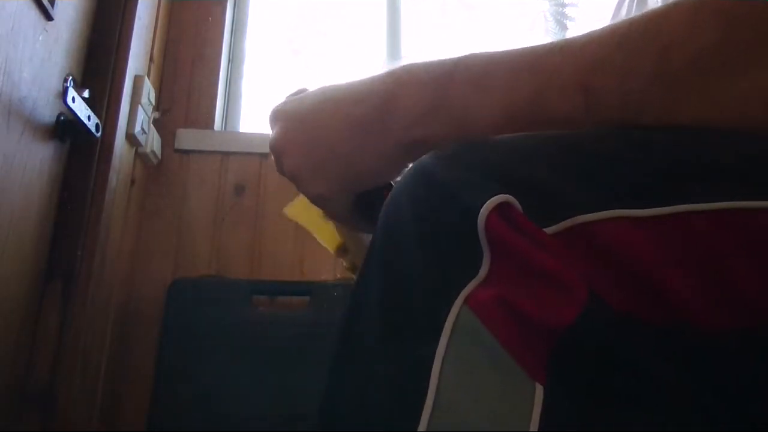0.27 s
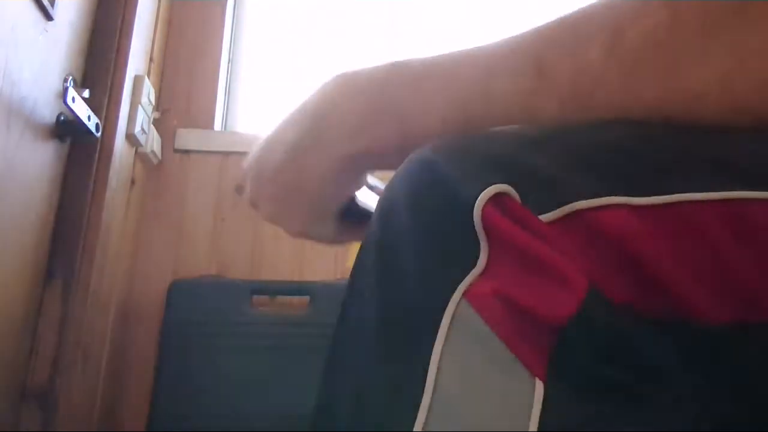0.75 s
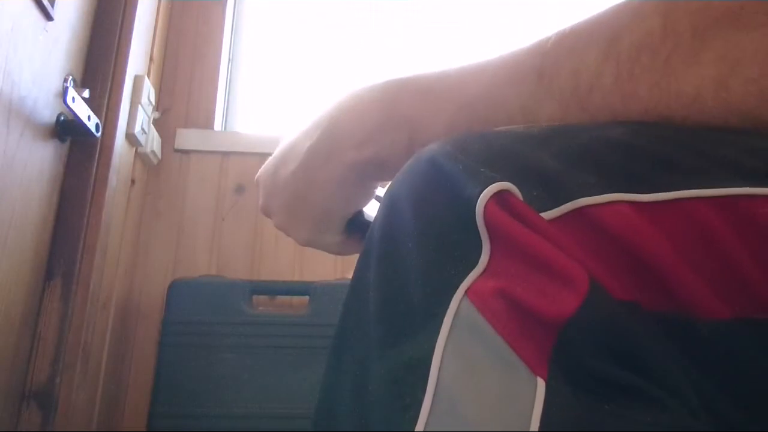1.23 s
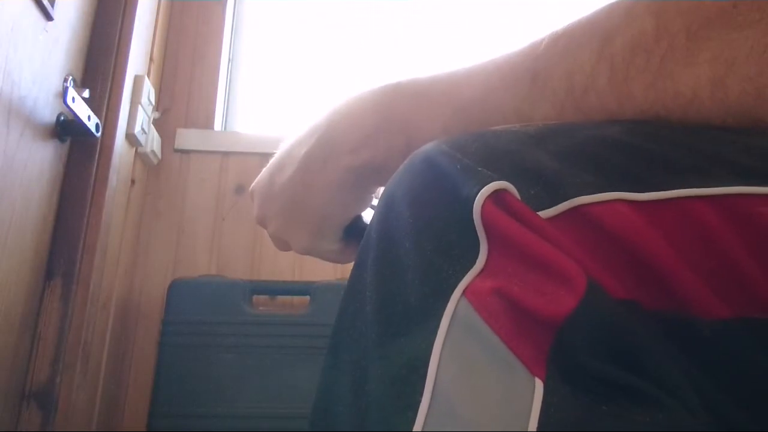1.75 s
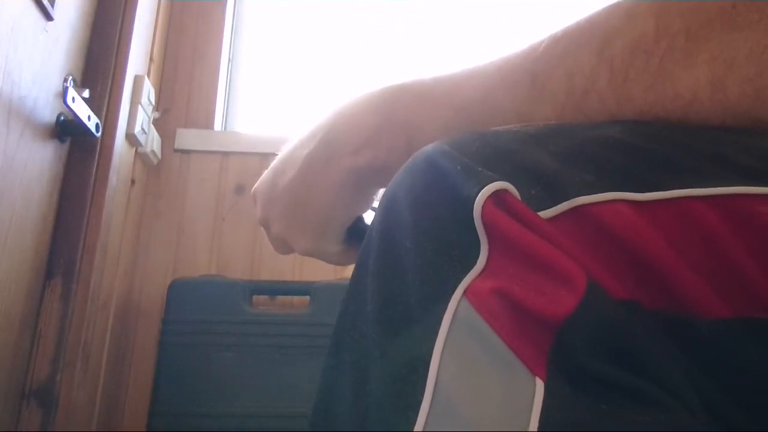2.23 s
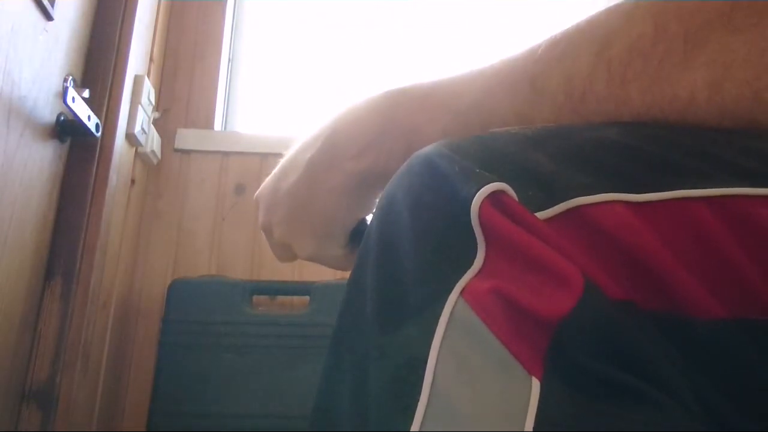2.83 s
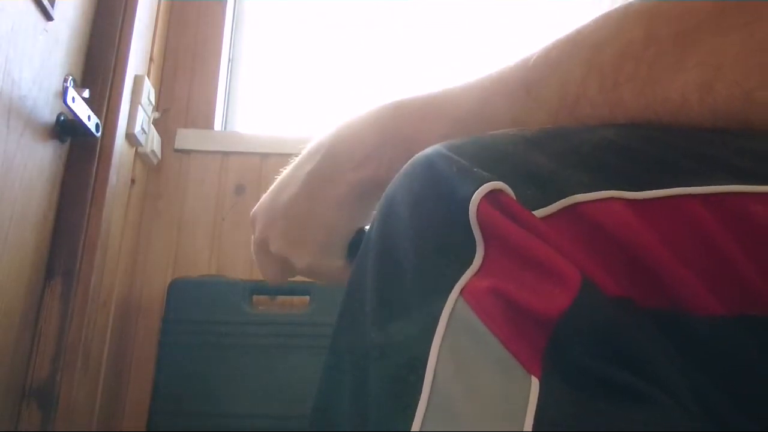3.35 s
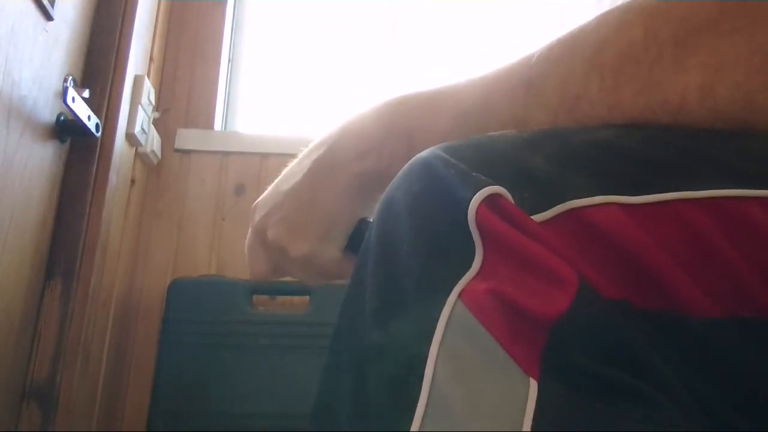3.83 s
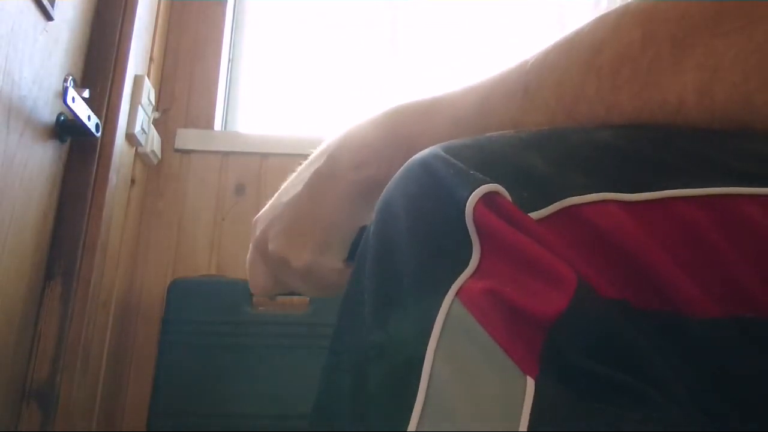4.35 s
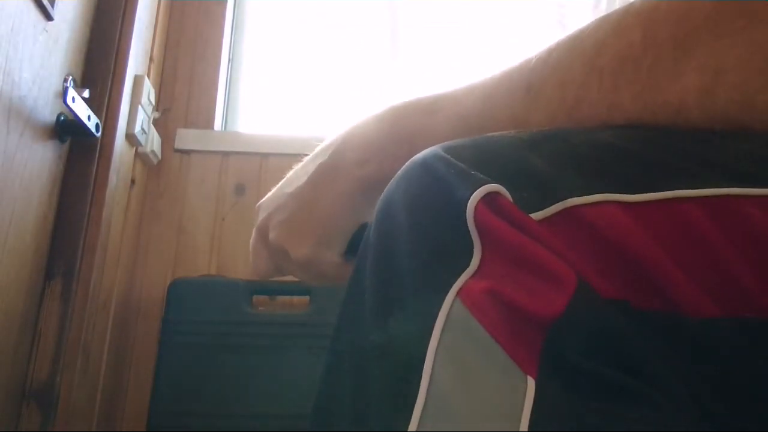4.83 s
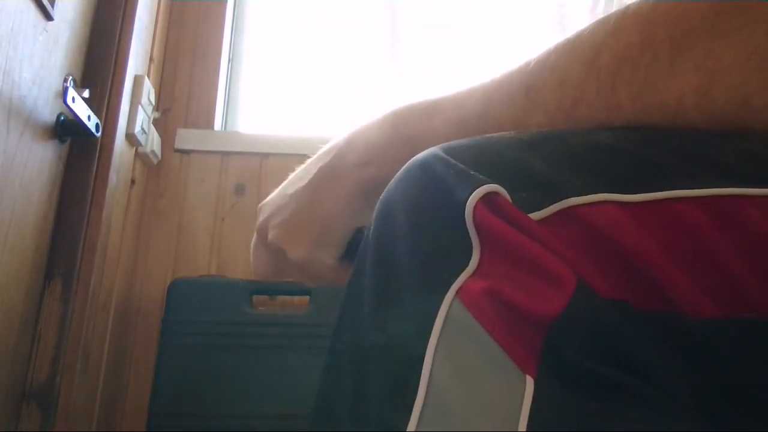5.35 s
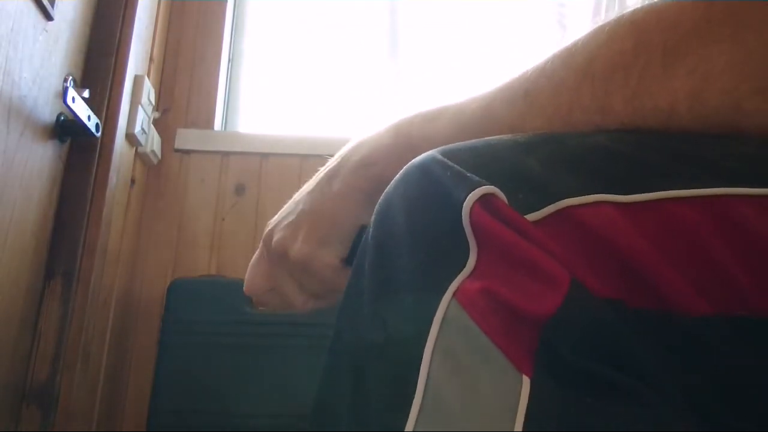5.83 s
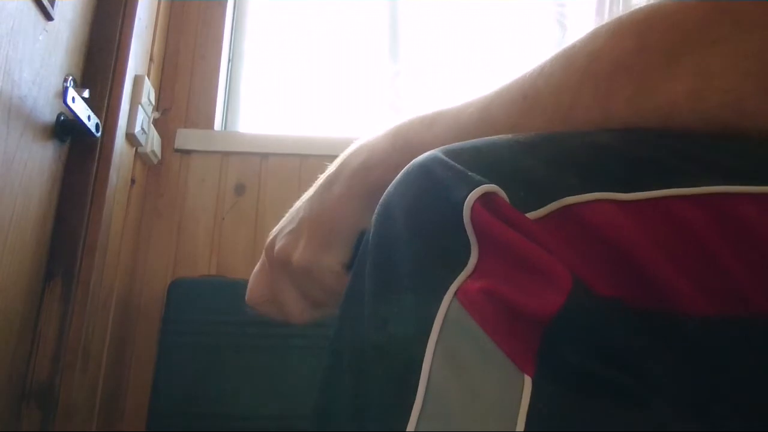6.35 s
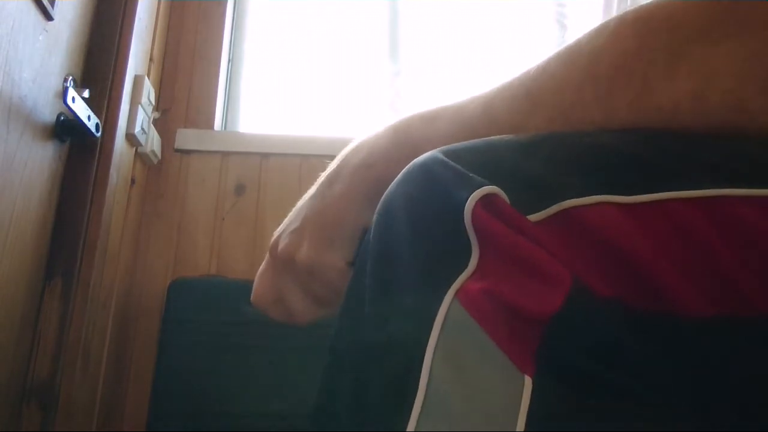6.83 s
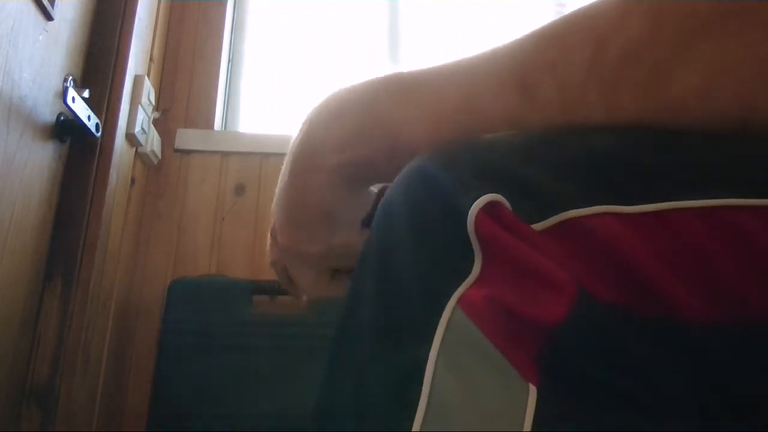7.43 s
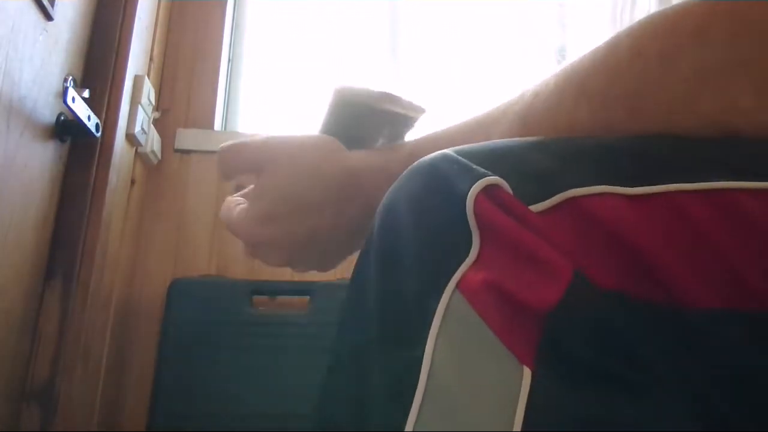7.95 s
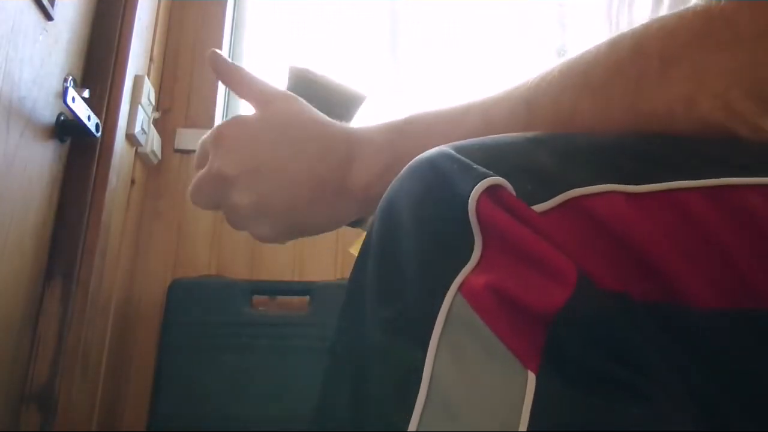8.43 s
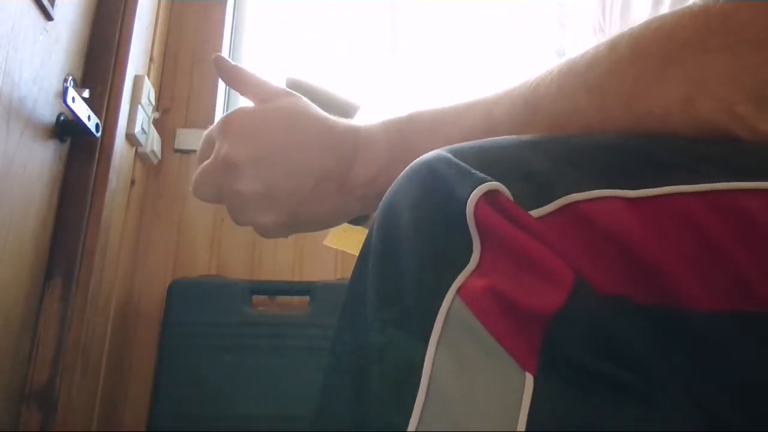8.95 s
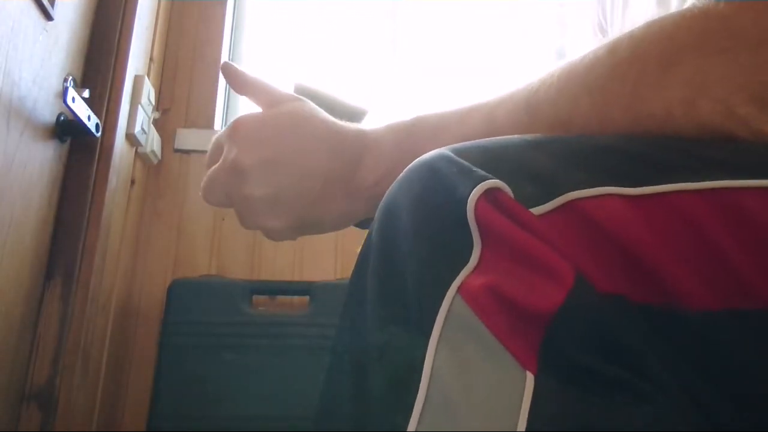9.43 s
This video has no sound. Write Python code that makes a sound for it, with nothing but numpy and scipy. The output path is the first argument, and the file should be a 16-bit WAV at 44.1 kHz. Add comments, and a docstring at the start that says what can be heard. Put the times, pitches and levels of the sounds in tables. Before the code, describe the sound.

A wooden handle is sanded by hand close to the microphone in a small, quiet, dry room. From 0 to 0.9 s the strokes are loud, rough and uneven, with sharp wooden knocks near 0.2, 0.4 and 0.8 s and dull low thumps near 0.3 and 0.75 s as the support shakes. After a brief lull around 1 s, a few duller rubs and a knock at 1.2 s follow, then sparse faint strokes. From 2 to 6.3 s quick, light, gritty back-and-forth rubs run at roughly seven or eight per second, varying in brightness, with a clack at 3.9 s. Strokes grow firmer at 6.4-6.8 s, with a small knock, then weaken. Around 7.8-8.1 s comes a short juddering drag. Two light knocks near 8.4 s accompany renewed scraping, continuing steadily until about 9.7 s.

```python
"""A small quiet room: a wooden handle is sanded by hand in quick back-and-forth strokes.
Grit tears the wood fibres: a dense shower of random clicks, rung through the handle's resonances.
The handle knocks now and then (noise bursts through the same resonances); something is dragged once
with a judder (pulsed noise). The moving arm shakes the microphone's support: low noise and damped sines.
A short noise tail is the room's echo; faint coloured noise is the room tone."""
import sys
import numpy as np
from scipy import signal
from scipy.fft import rfft, irfft, next_fast_len
from scipy.io import wavfile

SR = 44100
rng = np.random.default_rng(int(sys.argv[2]) if len(sys.argv) > 2 else 0)


def digitize_waveform(pressure):
    """Quantize a signal to 16-bit integers and store it at the path in sys.argv[1].

    Rows of a 2-D input are taken as channels; values are limited to [-1, 1].
    """
    field = np.atleast_2d(pressure).T
    bounded = np.clip(field, -1, 1)
    quanta = np.round(bounded * 32767).astype(np.int16)
    wavfile.write(sys.argv[1], SR, quanta)


N = 426888
STEP_SAMPLES = 64  # per point of a level curve
BANDS_PER_OCTAVE = 1.5

# Strokes. Each row: start in seconds, length in seconds, level at full speed in dB,
# fastest point as share of length (0-1), extra treble in dB.
STROKES = [(-0.044, 0.11, -38, 0.45, -0.5), (0.087, 0.14, -34, 0.56, 2.5), (0.262, 0.11, -30.5, 0.4, 6.5),
           (0.367, 0.26, -43.5, 0, 5), (0.474, 0.15, -33, 0.59, 4), (0.704, 0.081, -40.5, 0.63, 0.5),
           (0.777, 0.1, -34.5, 0.64, 6.5), (0.926, 0.15, -52, 0.53, 7.5), (1.037, 0.21, -51, 1, 3),
           (1.191, 0.14, -38, 0.2, -4), (1.293, 0.088, -40, 0.66, -5.5), (1.367, 0.077, -41, 0.57, -5),
           (1.451, 0.12, -46, 0.31, -5.5), (1.721, 0.097, -49, 0.53, 1), (1.945, 0.11, -44, 0.57, 2),
           (2.068, 0.09, -41, 0.56, 10.5), (2.185, 0.11, -40.5, 0.7, 1.5), (2.316, 0.099, -42.5, 0.5, 8.5),
           (2.429, 0.1, -42, 0.68, -0.5), (2.558, 0.086, -44, 0.46, 5.5), (2.68, 0.096, -48, 0.57, -0.5),
           (2.818, 0.074, -47, 0.6, 4), (2.908, 0.15, -43, 0.74, -0.5), (3.077, 0.073, -44.5, 0.43, 7),
           (3.177, 0.13, -40.5, 0.63, 3), (3.483, 0.079, -58, 0.5, -0.5), (3.547, 0.076, -41.5, 0.4, -0.5),
           (3.667, 0.17, -47, 0.72, -0.5), (3.866, 0.097, -44, 0.6, 5.0), (3.91, 0.17, -45, 0.75, 1),
           (4.092, 0.09, -46.5, 0.58, 4), (4.201, 0.11, -42, 0.77, 3.5), (4.326, 0.087, -44.5, 0.6, 7),
           (4.421, 0.14, -44, 0.46, 4.5), (4.571, 0.067, -43.5, 0.3, 4), (4.651, 0.095, -49.5, 0.55, 1.5),
           (4.771, 0.071, -45, 0.52, 5), (4.879, 0.12, -45.5, 0.8, 4), (5.01, 0.096, -42.5, 0.52, 3.5),
           (5.141, 0.14, -47.5, 0.64, -1.5), (5.331, 0.089, -46, 0.7, 1), (5.445, 0.17, -44.5, 0.79, 2),
           (5.65, 0.092, -47.5, 0.55, 1.5), (5.799, 0.2, -46.5, 0.82, -2.5),
           (6.011, 0.071, -41.5, 0.4, 0.5), (6.137, 0.12, -51.5, 0.63, 2), (6.277, 0.07, -43.5, 0.68, 3),
           (6.363, 0.16, -39.5, 0.72, 1), (6.534, 0.095, -36, 0.44, 0), (6.635, 0.11, -38.5, 0.66, 4),
           (6.761, 0.12, -36.5, 0.6, 9.5), (6.9, 0.089, -46.5, 0.22, 1), (6.969, 0.17, -45.5, 0.72, 9.5),
           (7.161, 0.24, -50.5, 0.66, 4), (7.372, 0.19, -54.5, 0.74, 7.5), (7.542, 0.11, -43.5, 0.52, 8),
           (7.686, 0.38, -50.5, 0.13, 3.5), (8.028, 0.18, -56, 0.45, -1.5), (8.269, 0.071, -38, 0.78, 2.5),
           (8.317, 0.14, -39, 0.53, 4.5), (8.467, 0.14, -48, 0.38, -7.5), (8.594, 0.12, -41.5, 0.4, 0),
           (8.696, 0.2, -41, 0.68, 4), (8.912, 0.16, -41, 0.74, 5), (9.089, 0.12, -41, 0.64, 8.5),
           (9.248, 0.11, -45.5, 0.64, 5), (9.402, 0.097, -47.5, 0.6, 5.5), (9.548, 0.12, -44.5, 0.7, 8.5)]
# Low wood tone as the grip shifts. Each row: time in seconds, extra level in dB.
GRIP_BODY = [(0, 9), (.6, 6), (1.0, 6), (1.5, 2.5), (2.0, -1), (2.62, -5), (2.72, 9.5), (2.85, -1.5),
             (3.2, -3), (3.7, 5.5), (4.2, 2), (5.1, 5), (6.0, 1), (6.42, -2), (6.65, 9.5), (7.6, 14),
             (8.3, -0.5), (9.68, 12)]
EDGE_DB = -12  # start and end of a stroke, re full speed
REST_DB = -73.5  # paper lying on the wood between strokes
USUAL_STROKE_DB = -41  # at full speed
RISE_SQUARENESS, FALL_SQUARENESS = 4.0, 1.2  # 2 = parabola in dB, more = flatter top, steeper flank
TREBLE_DB_PER_SLACK_DB = 0.052  # slack: level re full speed, negative when slower
BODY_DB_PER_SLACK_DB, BODY_DB_PER_FORCE_DB, BODY_DB_PER_TREBLE_DB = 0.35, 0.2, 0.78


def stroke_levels():
    """Hand speeds up and slows down: each stroke is a dome, neighbours' powers add at the turn."""
    start_s, length_s, top_db, fastest, treble_db = np.transpose(STROKES)
    t = coarse_time()
    fastest = np.clip(fastest, .1, .9)
    from_top = (t[:, None] - start_s) / length_s - fastest
    rising = from_top < 0
    off_top = np.where(rising, -from_top / fastest, from_top / (1 - fastest))  # 0 at top, 1 at ends
    squareness = np.where(rising, RISE_SQUARENESS, FALL_SQUARENESS)
    dome_db = np.maximum(top_db + EDGE_DB * off_top ** squareness, -120)
    power = from_db(2 * dome_db)
    total_power = power.sum(axis=1)
    level_db = 10 * np.log10(total_power + from_db(2 * REST_DB))

    # Power-weighted stroke settings at each moment.
    top_db = power @ top_db / total_power
    treble_db = power @ treble_db / total_power
    slack_db = level_db - top_db
    body_db = np.interp(t, *np.transpose(GRIP_BODY))
    body_db = body_db - BODY_DB_PER_SLACK_DB * slack_db
    body_db = body_db - BODY_DB_PER_FORCE_DB * (top_db - USUAL_STROKE_DB)
    body_db = body_db - BODY_DB_PER_TREBLE_DB * treble_db
    return level_db, treble_db + TREBLE_DB_PER_SLACK_DB * slack_db, body_db


def grains(per_s, spread_db):
    """Random clicks of uneven size and sign, two unrelated trains."""
    sizes_db = spread_db * np.minimum(rng.exponential(1, (2, N)), 4)
    sizes = from_db(sizes_db) * rng.choice([-1, 1], (2, N))
    return rms_one(sizes * (rng.random((2, N)) < per_s / SR))


# Handle resonances. Each row: frequency in Hz, width in Hz, level in dB.
HANDLE_MODES = [(540, 33, 1.5), (602, 17.5, -3.5), (1303, 94, -7.5), (1469, 33, 5), (1616, 110, -0.5),
                (1883, 10, 3.5), (2344, 33, -7), (2910, 75, 5)]


def handle(x, own_gain):
    """Parallel wood resonances, signs alternating; own_gain() is drawn per mode."""
    rung = 0
    for k, (hz, width_hz, level_db) in enumerate(HANDLE_MODES):
        rung = rung + (-1) ** k * from_db(level_db) * own_gain() * resonate(x, hz, width_hz)
    return rung


# Grit spectrum. Each row: frequency in Hz, density in dB per Hz.
GRIT_SPECTRUM = [(100, -41), (190, -15.5), (310, -16.5), (420, -7.5), (600, -8), (850, -12.5), (1400, 2),
                 (2500, 4), (4800, -5), (5700, -23), (6800, -20.5), (7500, -45), (8800, -32.5),
                 (10000, -17.5), (15800, -24)]


def sanding():
    """Torn fibres: a grain shower rings in the handle; stroke levels set its tilt, each band flickers."""
    level_db, treble_db, body_db = stroke_levels()
    level_db = level_db + 1.03 * drift(45.5)  # uneven grip
    body_db = body_db + 2.5 * drift(14.7)  # palm rubs in lumps
    shower = grains(per_s=6000, spread_db=1.5)

    def band_db(hz):
        """Stroke level, tilt and own flicker of one band."""
        treble_share = np.interp(np.log(hz), np.log([2500, 10000]), [0, 1])
        body_share = np.interp(np.log(hz), np.log([700, 1900]), [1, 0])
        flicker_db = 1.59 * drift(19.0) + 0.92 * drift(8.5)
        return level_db + treble_share * treble_db + body_share * body_db + flicker_db

    # The shifting grip damps now one mode, now another.
    rung = handle(shower, lambda: gain_of(4 * drift(6)))
    return in_bands(shower + 0.76 * rung, GRIT_SPECTRUM, band_db, top_hz=15000)


# Knocks of the handle against hand or paper. Each row: time in seconds, peak of the wood band in dB,
# crack in dB re that peak, thud in dB re that peak, rattle decay in seconds.
KNOCKS = [(.1745, -19, -8, -14, .006), (.379, -24, -5, -16, .006), (.785, -15.5, -1, -30, .014),
          (1.235, -19, -8, -14, .014), (1.474, -41, -20, 6, .015), (3.9275, -20, -8, -8, .026),
          (6.546, -29, -10, -8, .016), (8.396, -27, -5, -26, .005), (8.476, -30, -26, -5, .014)]


def knocks():
    """Clicks and a decaying rattle ring the handle; slower decays bounce harder; crack above, thud below."""
    length = 6000
    out = np.zeros((2, N))
    t = np.arange(length) / SR
    crack, wood, palm = (signal.butter(3, edges_hz, "band", fs=SR, output="sos")
                         for edges_hz in ([2100, 3800], [950, 2200], [190, 950]))
    for start_s, peak_db, crack_db, thud_db, rattle_s in KNOCKS:
        bounce = rattle_s / .05 * np.exp(-np.abs(t - .013) / .002)
        contact = .5 * np.exp(-t / rattle_s) + bounce
        noise = rng.standard_normal((2, length)) * contact
        rattle = np.array([noise[0], 0.14 * noise[0] + 1.3 * noise[1]])
        rattle[:, [0, 112]] += [-12, 10]  # first contact, second 2.5 ms on
        rung = .7 * rattle + 1.6 * handle(rattle, lambda: from_db(rng.normal(0, 2)))
        at = round(start_s * SR)
        for band, level_db in ((crack, crack_db), (wood, 0), (palm, thud_db)):
            part = signal.sosfilt(band, rung)
            if band is palm:
                part = part * (1 - np.exp(-t / .005))  # the thud builds
            out[:, at:at + length] += from_db(peak_db + level_db) * part / np.abs(part).max()
    return out * from_db([[1.5], [-1.5]])


# Juddering drag. Each row: time in seconds, level in dB.
DRAG_LEVEL = [(7.77, -72), (7.8, -46.5), (7.845, -48.5), (7.88, -42.5), (7.95, -41), (7.99, -32.5),
              (8.05, -51.5), (8.09, -80)]
# Drag spectrum. Each row: frequency in Hz, density in dB per Hz.
DRAG_SPECTRUM = [(110, -22), (220, 3.5), (588, -4), (815, -15), (1330, -0.5), (2550, 0.5), (4600, 0),
                 (6000, -14), (8000, -17.5), (10400, -12), (13000, -50)]


def drag():
    """Stick and slip: noise let through in jerks 8-18 ms apart, each decaying over 3 ms."""
    at = np.cumsum(rng.uniform(.008, .018, N // 300) * SR).astype(int)
    at = at[at < N]
    slips = np.zeros(N)
    slips[at] = from_db(rng.normal(0, 3, len(at)))
    jerks = .5 + signal.lfilter([1], [1, -np.exp(-1 / (.003 * SR))], slips)
    both, hz, size = at_ports(rng.standard_normal((2, N)) * jerks, DRAG_SPECTRUM)
    level_db = np.interp(coarse_time(), *np.transpose(DRAG_LEVEL), left=-120, right=-120)
    return irfft(both, size)[:, :N] * gain_of(level_db)


# Support rumble. Each row: time in seconds, level in dB.
RUMBLE_LEVEL = [(0.0, -64), (0.24, -54), (0.29, -34.5), (0.48, -54.5), (0.7, -60), (0.75, -37.5),
                (0.91, -60.5), (1.91, -55.5), (2.48, -65), (2.53, -54.5), (4.77, -63.5), (7.84, -60.5),
                (9.68, -61.5)]
# Rumble spectrum. Each row: frequency in Hz, density in dB per Hz.
SHAKE_SPECTRUM = [(15, -11), (45, -8), (90, 3), (140, -3), (200, -7), (330, -18)]


def shaking():
    """The arm shakes the microphone's support: low noise, lumpy in level and band by band."""
    level_db = np.interp(coarse_time(), *np.transpose(RUMBLE_LEVEL)) + 3.0 * drift(14)
    noise = rng.standard_normal((2, N))
    return in_bands(noise, SHAKE_SPECTRUM, lambda hz: level_db + 5.7 * drift(21), top_hz=300)


# Low thumps through the support. Each row: time in seconds, peak in dB (mean of both channels),
# starting pitch in Hz.
THUMPS = [(0.271, -34.5, 101), (0.349, -43, 98), (0.743, -33, 140), (1.338, -44, 123), (1.91, -49.5, 132),
          (2.513, -48, 115), (6.329, -47.5, 73.5)]
THUMP_T60_S, THUMP_ATTACK_S = 0.14, 0.0068
THUMP_SAG_PER_S = 0.64  # share of starting pitch lost per second


def thumps():
    """Damped support resonances: soft-started sines, sinking in pitch as they die."""
    out = np.zeros((2, N))
    t = np.arange(12000) / SR
    envelope = (1 - np.exp(-t / THUMP_ATTACK_S)) * from_db(-60 * t / THUMP_T60_S)
    for start_s, peak_db, hz in THUMPS:
        cycles = hz * t * (1 - THUMP_SAG_PER_S * t / 2)
        thump = envelope * np.sin(2 * np.pi * cycles)
        at = round(start_s * SR)
        out[:, at:at + len(t)] += from_db(peak_db) * thump / np.abs(thump).max() * from_db([[2.2], [-2.2]])
    return out


ROOM_T60_S, ROOM_DB = 0.043, -8.5


def room(x):
    """Reflections: a dense, dull decaying noise tail, separate in each channel."""
    t = np.arange(SR // 2) / SR
    tail = rng.standard_normal((2, len(t))) * from_db(-60 * t / ROOM_T60_S) * (t > .004)
    tail = signal.lfilter([1], [1, -.6], tail)
    tail = tail / np.sqrt(np.sum(tail ** 2, axis=1, keepdims=True))
    return from_db(ROOM_DB) * signal.fftconvolve(x, tail, axes=1)[:, :N]


# Room tone spectrum. Each row: frequency in Hz, density in dB per Hz.
AIR_SPECTRUM = [(200, -12.5), (900, -16), (5000, -38), (5600, -62)]
AIR_DB = -70


def room_tone():
    """Steady coloured noise of the quiet room."""
    air, hz, size = at_ports(rng.standard_normal((2, N)), AIR_SPECTRUM)
    return from_db(AIR_DB) * irfft(air, size)[:, :N]


def from_db(db):
    """Decibels to gain."""
    return 10 ** (np.asarray(db) / 20)


def rms_one(x):
    """Scale to rms 1."""
    return x / np.sqrt(np.mean(x ** 2) + 1e-20)


def at_hz(points, hz, axis=1):
    """Read a table column on a log-frequency axis."""
    points = np.array(points)
    return np.interp(np.log(hz), np.log(points[:, 0]), points[:, axis])


def coarse_time():
    """Times of the level-curve points in seconds."""
    return np.arange(N // STEP_SAMPLES + 2) * STEP_SAMPLES / SR


def gain_of(coarse_db):
    """A coarse dB curve as a gain per sample."""
    return np.interp(np.arange(N) / SR, coarse_time(), from_db(coarse_db))


def drift(rate_hz):
    """Slow random curve of rms 1 on the coarse axis: noise twice through a one-pole low-pass."""
    r = np.exp(-2 * np.pi * rate_hz * STEP_SAMPLES / SR)
    settle = 1000
    noise = rng.standard_normal(len(coarse_time()) + settle)
    return rms_one(signal.lfilter([1], [1, -2 * r, r * r], noise)[settle:])


def resonate(x, hz, width_hz):
    """One two-pole resonance, gain about 1 on top."""
    r = np.exp(-np.pi * width_hz / SR)
    top = (1 - r * r) / 2
    return signal.lfilter([top, 0, -top], [1, -2 * r * np.cos(2 * np.pi * hz / SR), r * r], x)


# Likeness of the two microphone ports. Each row: frequency in Hz, share common to both (0-1).
PORT_LIKENESS = [(60, 0.97), (300, 0.8), (1000, 0.58), (4000, 0.3), (12000, 0.13)]
# Port offset. Each row: frequency in Hz, left over right in dB, left's phase lead in radians.
PORT_LEFT_LEAD = [(60, 4.5, 0), (520, 4.5, -.4), (1290, 2.5, .6), (2240, 2, -6.4), (5000, 1.5, -5),
                  (11000, 4, -4)]


def at_ports(pair, spectrum):
    """Two unrelated signals, coloured and mixed into left and right spectra; joint rms 1."""
    size = next_fast_len(N)
    hz = np.maximum(np.fft.rfftfreq(size, 1 / SR), 1)
    alike = np.clip(at_hz(PORT_LIKENESS, hz), 0, 1)
    half_lead_db = at_hz(PORT_LEFT_LEAD, hz) / 2
    lead_rad = at_hz(PORT_LEFT_LEAD, hz, axis=2)
    coloured = rfft(pair, size) * from_db(at_hz(spectrum, hz))
    common, apart = coloured * np.sqrt([1 + alike, 1 - alike])
    left = (common + apart) * from_db(half_lead_db)
    right = (common - apart) * from_db(-half_lead_db) * np.exp(-1j * lead_rad)
    both = np.array([left, right])
    return both / np.sqrt(np.sum(np.abs(both) ** 2)) * size, hz, size


def in_bands(pair, spectrum, band_db, top_hz):
    """at_ports in overlapping bands up to about top_hz, each under the level curve band_db(hz)."""
    both, hz, size = at_ports(pair, spectrum)
    position = BANDS_PER_OCTAVE * np.log2(hz)
    first = int(BANDS_PER_OCTAVE * np.log2(spectrum[0][0]))
    last = int(BANDS_PER_OCTAVE * np.log2(top_hz)) + 1
    out = np.zeros((2, N))
    for k in range(first, last + 1):
        share = np.cos(np.pi / 2 * np.clip(position - k, -1, 1)) ** 2  # neighbours sum to one
        out += irfft(both * share, size)[:, :N] * gain_of(band_db(2 ** (k / BANDS_PER_OCTAVE)))
    return out


# Sideways shift of the sanding. Each row: time in seconds, extra left over right in dB.
LEAN = [(0, -1), (1.5, 1.2), (3.8, 0.4), (9.68, 0)]


def scene():
    """Sanding, drag and knocks with their room tail, over support rumble and room tone."""
    half_lean_db = np.interp(coarse_time(), *np.transpose(LEAN)) / 2
    work = sanding() * [gain_of(half_lean_db), gain_of(-half_lean_db)] + knocks() + drag()
    return work + room(work) + shaking() + thumps() + room_tone()


STOPBAND_HZ = 16050


def record(dry):
    """Steep low-pass, 70 dB down from STOPBAND_HZ."""
    return signal.sosfilt(signal.cheby2(16, 70, STOPBAND_HZ, fs=SR, output="sos"), dry)


dry = scene()
out = record(dry)
digitize_waveform(out)
```